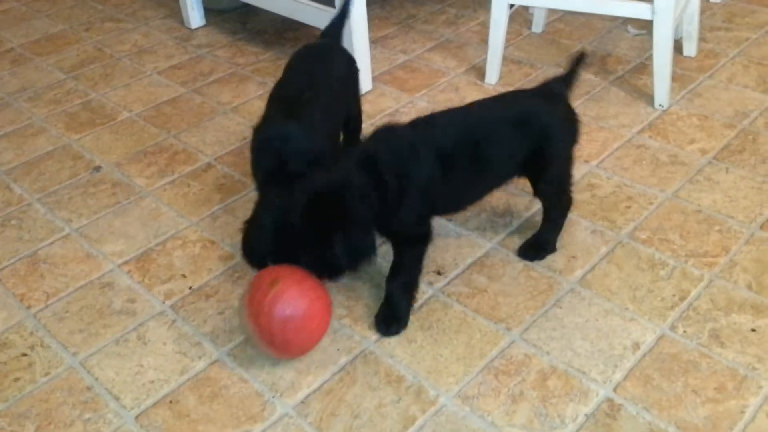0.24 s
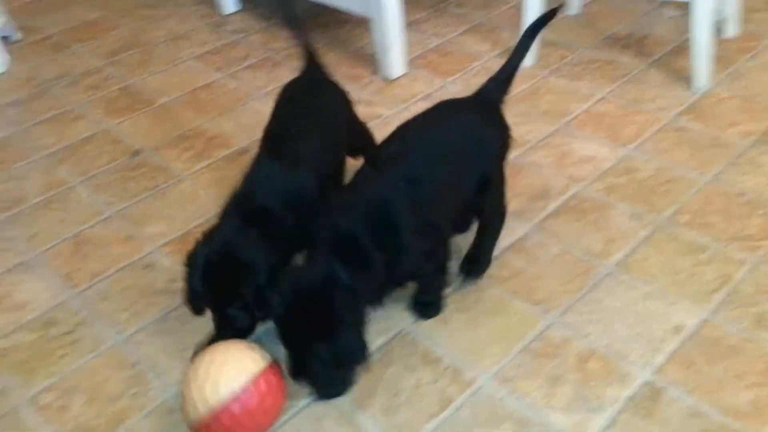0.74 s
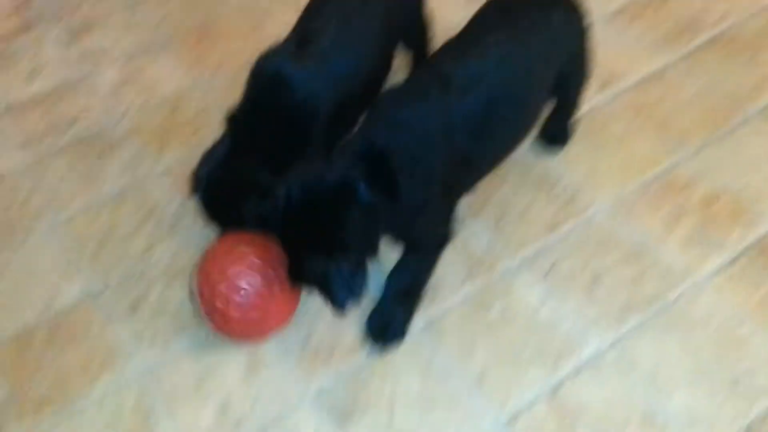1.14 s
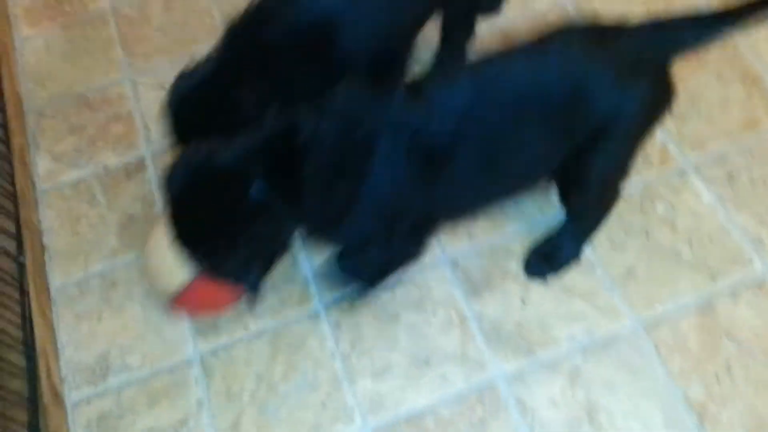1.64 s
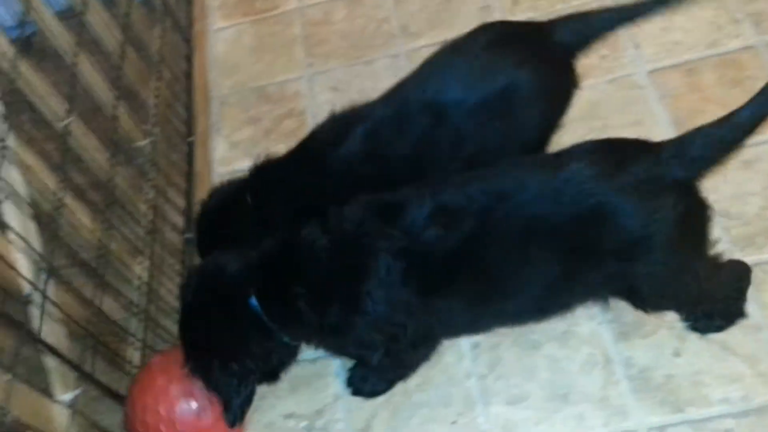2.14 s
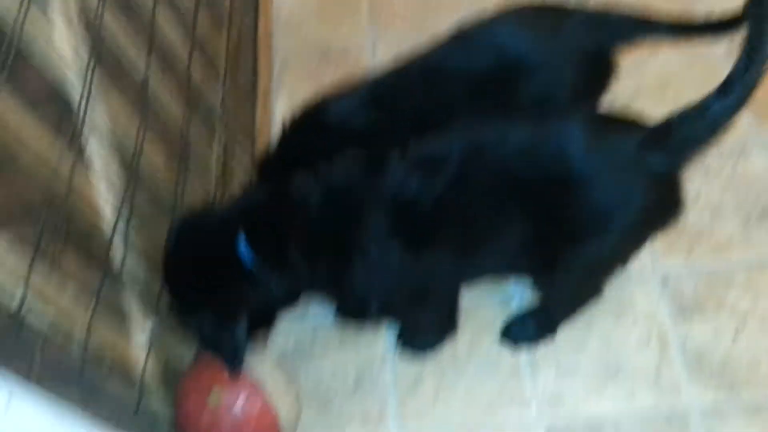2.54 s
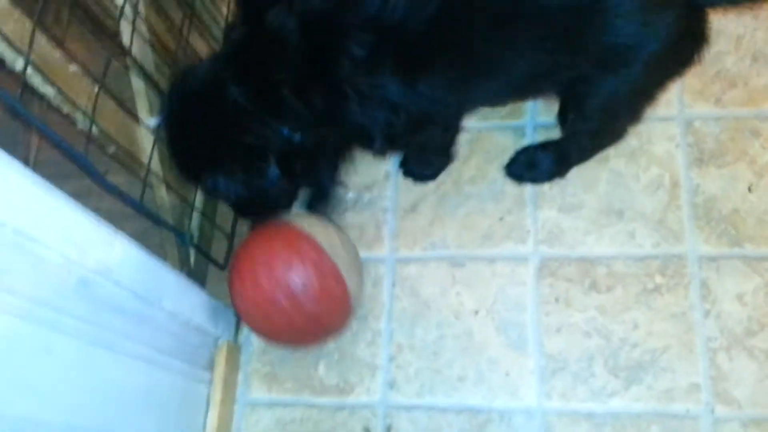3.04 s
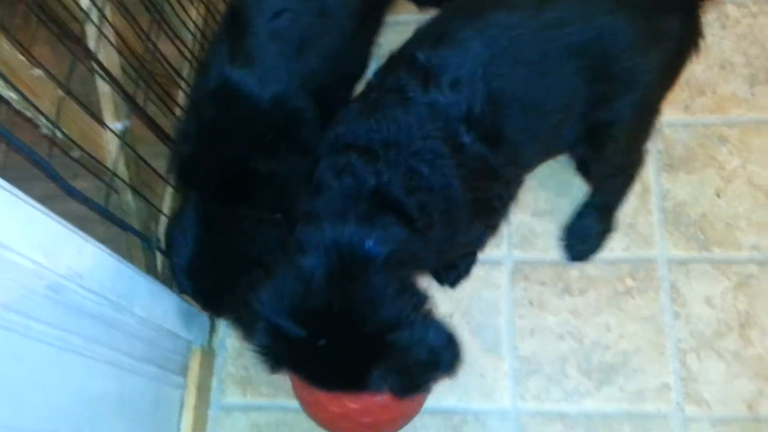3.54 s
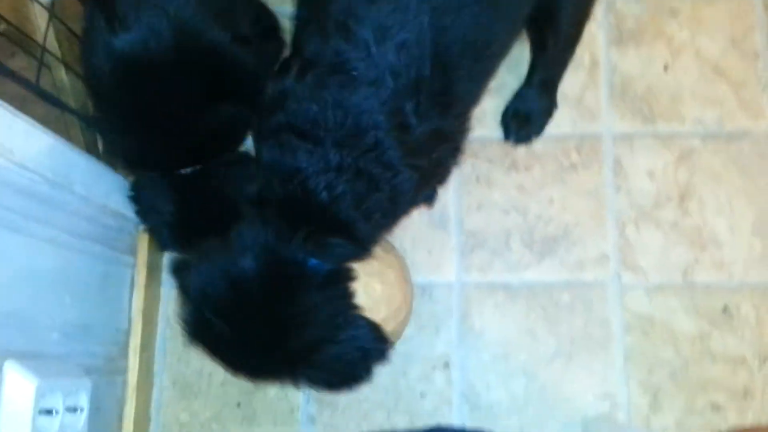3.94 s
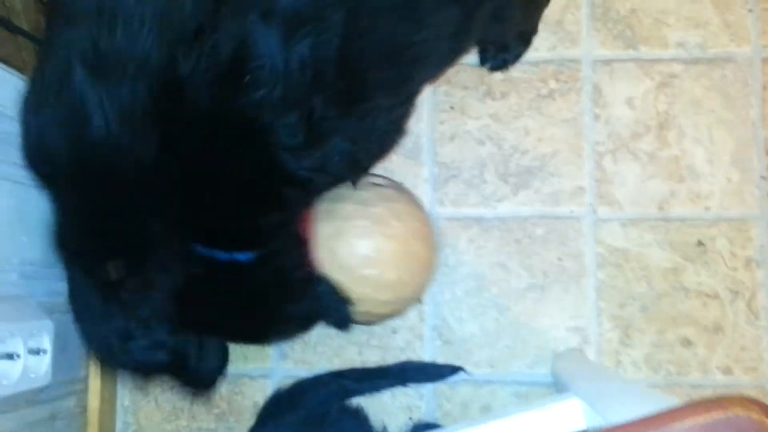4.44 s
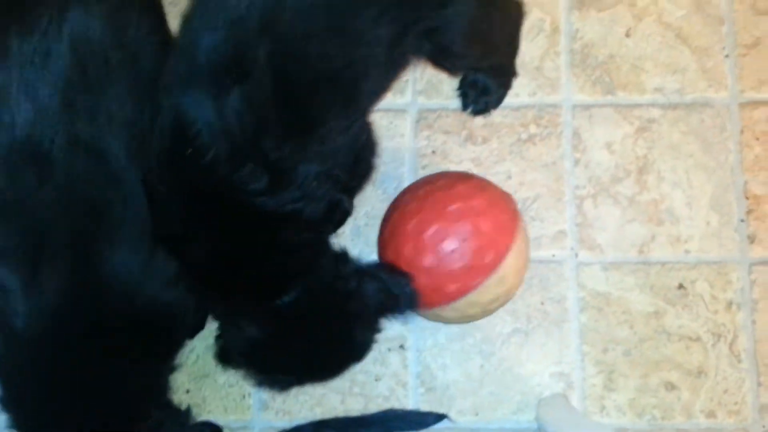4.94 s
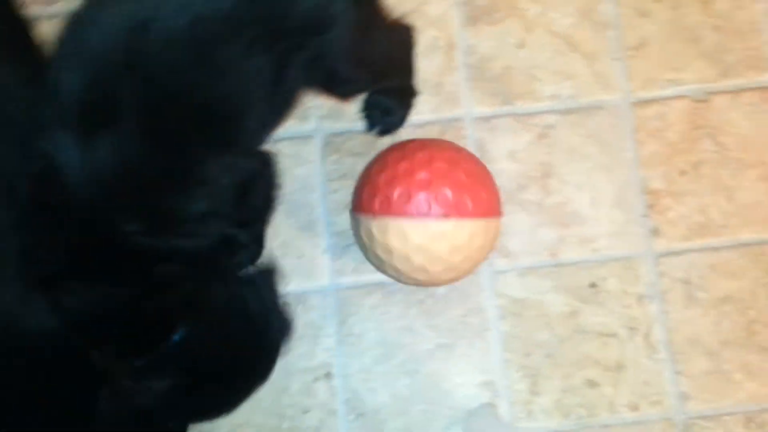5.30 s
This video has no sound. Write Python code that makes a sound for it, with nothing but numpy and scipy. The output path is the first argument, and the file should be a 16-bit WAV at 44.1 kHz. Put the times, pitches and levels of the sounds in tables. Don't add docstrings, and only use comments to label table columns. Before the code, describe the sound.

Puppy paws and claws scuff on tile while a rolling hollow ball clacks faster, crashes against a rattling wire crate, and settles into sparse knocks.

```python
import sys
import numpy as np
from scipy import signal
from scipy.io import wavfile
from scipy.ndimage import uniform_filter1d, minimum_filter1d

SR = 44100
rng = np.random.default_rng(int(sys.argv[2]) if len(sys.argv) > 2 else 0)


def field_ratio(decibels):
    return 10 ** (np.asarray(decibels, dtype=float) / 20)


def inscribe(sig):
    pcm = np.round(np.clip(np.atleast_2d(sig).T, -1, 1) * 32767)
    wavfile.write(sys.argv[1], SR, pcm.astype(np.int16))


N = 245637

# f/Hz, level/dB, time to fade by 60 dB/s
SHELL_MODES = [(1205, 22.5, 0.023), (1472, 11.5, 0.017), (1920, -56, 0.06), (2330, 6, 0.03)]


def rms_one(x):
    return x / np.sqrt(np.mean(x ** 2) + 1e-20)


def in_time(rows):
    s, *columns = np.transpose(rows)
    return [np.interp(np.arange(N) / SR, s, c) for c in columns]


def while_on(rows):
    start, end = rows[0][0], rows[-1][0]
    return np.interp(np.arange(N) / SR, [start - .01, start, end, end + .01], [0, 1, 1, 0])


def at_hz(points, hz):
    f, value = np.transpose(points)
    return np.interp(np.log(hz), np.log(f), value)


def sides(pan_db):
    return field_ratio(np.array([[.5], [-.5]]) * pan_db)


def drift(rate):
    r = np.exp(-80 * np.pi * rate / SR)
    slow = signal.lfilter([1], [1, -2 * r, r * r], rng.standard_normal(N // 40 + 2002))[2000:]
    return np.interp(np.arange(N) / 40, np.arange(len(slow)), rms_one(slow))


def ring(clicks, hz, t60):
    r, w = field_ratio(-60 / (t60 * SR)), 2 * np.pi * hz / SR
    return signal.lfilter([0, np.sin(w)], [1, -2 * r * np.cos(w), r * r], clicks + 1e-18)


def grains(per_s, uneven_db):
    sizes = field_ratio(uneven_db * np.minimum(rng.exponential(1, N), 4)) * rng.choice([-1, 1], N)
    return sizes * (rng.random(N) < per_s / SR)


def add(out, at_s, piece):
    i = round(at_s * SR)
    out[:, i:i + piece.shape[1]] += piece[:, :N - i]


def band(x, low_hz, high_hz):
    return signal.sosfilt(signal.butter(3, [low_hz, high_hz], "band", fs=SR, output="sos"), x)


def dying(events):
    power, t = np.zeros((1, N)), np.arange(SR) / SR
    for s, db, t60 in events:
        add(power, s, field_ratio(2 * db - 120 * t / np.clip(t60, .02, 2))[None])
    return np.sqrt(power[0])


def banded(sources, spectrum, patchy_db):
    # f/Hz, likeness (0 to 1)
    likeness = [(60, 0.55), (180, 0.64), (540, 0.44), (1630, 0.06), (4890, 0.02), (14700, 0.01)]
    # f/Hz, level/dB
    tilt = [(60, -3), (180, 1), (540, -3), (1630, 0.5), (4890, -7), (14700, -2.5)]
    out, edges = 0, 28 * 2 ** np.arange(0, 9.3, .5)
    for k, (low, high) in enumerate(zip(edges, edges[1:])):
        hz = np.sqrt(low * high)
        if at_hz(spectrum, hz) < -45:
            continue
        half_octave = signal.butter(2, [low, high], "band", fs=SR, output="sos")
        mid, side = signal.sosfilt(half_octave, sources[k % 2])
        alike = np.clip(at_hz(likeness, hz), -1, 1)
        gain = field_ratio(at_hz(spectrum, hz) + patchy_db * drift(21.0)) * sides(at_hz(tilt, hz))
        out = out + gain * (np.sqrt(1 + alike) * mid + np.sqrt(1 - alike) * side * [[1], [-1]])
    return rms_one(out)


def bodies():
    # t/s, level/dB
    bustle = [(0.0, -63), (0.31, -62.5), (0.65, -53), (1.16, -51), (1.57, -49.5), (1.92, -50.5),
              (2.03, -39.5), (2.17, -46), (2.44, -54), (3.15, -54), (3.35, -62.5), (3.55, -62),
              (4.15, -58.5), (4.28, -57), (4.42, -52), (4.61, -66.5), (4.84, -64), (5.1, -58), (5.57, -61)]
    # f/Hz, width/Hz, level/dB
    boards = [(132, 82, 11), (212, 21, 2), (242, 22, 0.5), (280, 73, 4.5), (322, 55, -10)]
    # f/Hz, level/dB
    shuffle_colour = [(60, -27), (200, 1.5), (400, -0.5), (700, -5), (1000, 4.5), (2000, -77), (15000, -75)]
    # f/Hz, level/dB
    scuff_colour = [(60, -50), (1000, -71), (2500, -1.5), (4500, 8.5), (7000, 4.5), (10000, -9.5),
                    (15000, -4)]
    # t/s, peak level/dB, time to fade by 60 dB/s
    swipes = [(0.3531, -48, 0.84), (0.6035, -40, 0.06), (0.914, -41.5, 0.48), (1.059, -40, 0.14),
              (1.2744, -42, 0.25), (1.5105, -54, 0.12), (1.6337, -36.5, 0.08), (1.8248, -31, 0.078),
              (1.9215, -39.5, 0.42), (2.7267, -50, 0.29), (2.9144, -55, 0.15), (2.9901, -54, 0.1),
              (3.116, -38, 0.15), (3.2715, -44, 0.14), (3.7494, -44.5, 0.079), (3.9754, -46, 0.88),
              (4.469, -34, 0.24), (4.572, -44, 0.17), (4.7765, -46.5, 0.035), (4.9167, -62, 0.09),
              (5.2394, -47, 0.075)]
    shuffle_db, = in_time(bustle)
    swing_db = shuffle_db + 55
    rumble_db, scuff_db = -59 + 1.67 * swing_db, -58.5 + swing_db

    push = rng.standard_normal((2, N)) * [[1], [.15]] * field_ratio(6.2 * drift(20.0))
    push = np.array([push[0] + push[1], push[0] - push[1]])
    rumble = 0
    for k, (hz, width, db) in enumerate(boards):
        board = ring(ring(push, hz, 1.6 / width), hz, 1.8 / width)
        rumble = rumble + (-1) ** k * field_ratio(db) * rms_one(board)
    rumble = field_ratio(rumble_db - 0.9) * rms_one(band(rumble, 142, 2000)) * sides(-2.5)

    grit = (.5 + np.abs(grains(900, uneven_db=4.5))) * rng.standard_normal((2, 2, N))
    shuffle = field_ratio(shuffle_db + 1.0) * banded(grit, shuffle_colour, patchy_db=2.0)
    swiping = field_ratio(-3.0) * uniform_filter1d(dying(swipes), size=200)
    scuff = np.hypot(field_ratio(scuff_db + 3.0), swiping) * banded(grit[::-1], scuff_colour, patchy_db=1.0)
    return rumble + shuffle + scuff


def chatter():
    # t/s, level/dB
    stages = [
        [(0.0, -77), (0.608, -46.5), (0.914, -52.5), (1.15, -48.5), (1.3, -53.5), (1.44, -50.5), (1.7, -52.5),
         (1.99, -46)],
        [(3.3, -69), (4.36, -56.5), (4.63, -82), (4.97, -76), (5.02, -54.5), (5.2, -59), (5.27, -71),
         (5.38, -60.5)],
    ]
    level = sum(while_on(rows) * field_ratio(in_time(rows)[0]) for rows in stages)
    clicks = grains(410, uneven_db=3.0)
    fade = field_ratio(-60 / (.011 * SR))
    rasps = signal.lfilter([1], [1, -fade], np.abs(clicks)) * rng.standard_normal((2, 2, N))
    dull = sides(-4.0) * rms_one(band(rasps[0], 1320, 2210))
    bright = 0.94 * sides(-2.9) * rms_one(band(rasps[1], 2110, 4280))
    shell = sum(field_ratio(db) * ring(rasps[0], hz, t60) for hz, db, t60 in SHELL_MODES)
    return level * field_ratio(5.0) * rms_one(dull + bright + 0.31 * rms_one(band(shell, 1900, 9800)))


def jangle():
    # t/s, level/dB
    jangling = [
        (1.96, -44),
        (2.144, -38),
        (2.6, -50.5),
        (2.78, -49.5),
        (3.35, -63),
    ]
    # f/Hz, width/Hz, level/dB
    wire_modes = [(2100, 60, 10), (2960, 61, 7), (3540, 73, -26), (4255, 33, 3), (4940, 32, -23),
                  (5430, 24, -29), (5370, 160, -18), (5600, 89, 5), (6900, 310, -28)]
    # f/Hz, level/dB
    wire_colour = [(290, -33), (500, -9.5), (724, 2.5), (922, -42), (1080, 1.5), (1370, 2.5), (4230, 1.5),
                   (13400, -20.5), (14200, -32), (15000, -71)]
    # t/s, wire peak level/dB, time to fade by 60 dB/s, floor pan peak level/dB
    blows = [(0.0034, -39.5, 0.15, -51.5), (1.994, -17, 0.091, -37), (2.006, -7.5, 0.11, -21),
             (2.07, -9.5, 0.27, -21.5), (2.0865, -8.5, 1, -58), (2.133, -9.5, 0.31, -28),
             (2.244, -16.5, 0.61, -60), (2.308, -28, 1, -66), (2.3655, -23.5, 0.6, -55),
             (2.5005, -22, 0.33, -59), (2.657, -29, 0.86, -64), (2.7664, -31, 0.63, -52.5),
             (2.982, -27, 0.066, -40), (3.2753, -36, 0.25, -54), (3.7494, -61, 0.28, -61),
             (4.4687, -34, 0.32, -45), (4.499, -64, 0.27, -61)]
    clashes = grains(3000 * field_ratio(1.5 * drift(60.0)), uneven_db=1.5) * rng.standard_normal((2, 2, N))
    wash = banded(clashes, wire_colour, patchy_db=-1.7)
    rings = 0
    for k, (hz, width, db) in enumerate(wire_modes):
        rings = rings + field_ratio(db) * rms_one(ring(clashes[k % 2], hz, 2.2 / width))
    wires = rms_one(wash + .28 * rms_one(rings) * sides(-4.0))
    wires[0] = signal.sosfilt(signal.butter(1, 3500, fs=SR, output="sos"), wires[0])
    steady = while_on(jangling) * field_ratio(in_time(jangling)[0] + 3.0)
    level = np.hypot(steady, field_ratio(-11.0) * dying([b[:3] for b in blows]))

    pan = rms_one(band(clashes[0] + 2.5 * clashes[1, :1], 173, 846)) * sides(-2.5)
    boom = field_ratio(-2.0) * dying([(s, pan_db, 1.62 * t60) for s, db, t60, pan_db in blows])
    return level * band(wires, 190, 16000) + boom * pan


def thumps():
    # t/s, peak level/dB
    drops = [(0.549, -38), (0.592, -34.5), (0.683, -38), (0.811, -37), (0.913, -30), (0.94, -23),
             (0.987, -31), (1.054, -30.5), (1.126, -20.5), (1.226, -25.5), (1.419, -26.5), (1.5, -20),
             (1.539, -26.5), (1.587, -25.5), (1.659, -25), (1.72, -33), (1.784, -31.5), (1.818, -27.5),
             (1.899, -29), (1.354, -28), (2.83, -39), (2.899, -30.5), (3.279, -35), (3.333, -38)]
    # t/s, peak level/dB, f/Hz
    landings = [(0.004, -34.5, 169), (0.026, -35.5, 216), (0.281, -40.5, 338), (0.44, -40.5, 304),
                (0.571, -32, 320), (0.736, -32, 377), (1.35, -34, 234), (2.01, -9, 228), (2.041, -14, 157),
                (2.075, -12.5, 237), (2.12, -7.5, 248), (2.169, -25, 248), (2.235, -27, 270),
                (2.377, -27.5, 217), (2.646, -43, 214), (2.814, -24, 212), (2.89, -25, 209),
                (2.966, -30, 212), (3.126, -31.5, 280), (3.277, -25.5, 262), (3.332, -34, 252),
                (3.75, -30, 241), (3.754, -38, 560), (4.042, -40, 218), (4.214, -41.5, 167),
                (4.291, -40, 214), (4.473, -29, 162), (4.502, -29.5, 322), (4.779, -35.5, 221),
                (5.202, -39.5, 225), (5.386, -41.5, 185)]
    out, t = np.zeros((2, N)), np.arange(SR // 4) / SR
    weights = [(s, db, 139.3) for s, db in drops] + landings
    weights += [(s, db - 2.5, 230.5) for s, db in drops]
    chance = rng.random((len(weights), 2))
    puffs = band(rng.standard_normal((len(weights), len(t))), 70, 600)
    for (s, db, hz), (turn, step), puff in zip(weights, chance, puffs):
        neighbour_hz = hz * (0.618 + 0.95 * step)
        swing = np.sin(2 * np.pi * hz * t) + 0.48 * np.sin(2 * np.pi * (neighbour_hz * t + turn))
        swing = swing + 0.15 * rms_one(puff)
        swing = swing * field_ratio(-60 * t * hz / 23.5) * (1 - np.exp(-t / 0.0019)) ** 2
        add(out, max(s - .005, 0), field_ratio(db - 9.0) * sides(-2.2) * swing / np.abs(swing).max())
    return band(out, 70, 2300)


def facet_strikes():
    # t/s, peak level/dB
    tips = [(0.193, -36.5), (0.3135, -23), (0.361, -30), (0.414, -34), (0.5414, -26), (0.6514, -36),
            (0.9003, -29), (1.038, -21), (1.074, -17), (1.1713, -27), (1.224, -30), (1.2952, -28.5),
            (1.429, -25.5), (1.561, -18.5), (1.743, -28), (1.7924, -26), (1.907, -25), (2.937, -32),
            (3.327, -39), (3.4543, -37), (3.488, -40), (3.865, -36), (3.603, -39), (3.617, -40),
            (3.885, -34.5), (4.165, -35), (4.149, -36), (4.416, -34.5), (4.63, -43), (0.925, -32),
            (5.189, -31.5), (5.21, -35), (5.275, -47)]
    # t/s, peak level/dB, strongest f/Hz, bareness/dB
    roll_knocks = [(0.2349, -26, 1440, 19.5), (0.2767, -21.5, 1190, 0), (0.4802, -24.5, 2280, 14),
                   (0.4992, -20.5, 1700, 8), (0.5177, -15, 1270, 2), (0.602, -22.5, 1720, 16),
                   (0.6275, -18, 4020, 18), (0.715, -14.5, 1220, -2.5), (0.76, -32, 1260, 14),
                   (0.8027, -17, 2500, 4.5), (0.8197, -31, 1260, 2), (0.8539, -16, 1840, 1.5),
                   (0.8613, -19, 1740, -3), (0.9464, -17.5, 1750, 0), (0.968, -14, 2000, 8),
                   (1.0064, -19, 1870, 4), (1.059, -10, 4200, 4), (1.1242, -11.5, 1240, -0.5),
                   (1.1516, -14.5, 1540, 3.5), (1.4973, -17, 3250, -17), (1.504, -10, 1920, -6),
                   (1.5122, -14, 2900, -11), (1.5748, -17.5, 3430, 13), (1.6745, -18, 1870, -3),
                   (1.691, -11, 3520, -1), (1.7223, -24, 1260, -10), (1.8244, -14, 3260, 3),
                   (1.8289, -11.5, 1230, -5.5), (1.922, -13.5, 2150, 2), (1.9644, -28, 1760, 0),
                   (1.9698, -18, 2100, 0)]
    # t/s, peak level/dB, strongest f/Hz, bareness/dB
    glances = [(0.3353, -30, 4620, 8), (0.353, -24, 4740, 11), (0.4336, -34, 3730, 8),
               (0.5813, -24, 4100, 15), (0.7576, -22.5, 4370, 8), (0.9163, -26, 4510, 8),
               (1.1374, -37, 3980, 8), (1.24, -31, 4180, 8), (1.634, -29, 5720, 8)]
    # t/s, peak level/dB, strongest f/Hz, bareness/dB
    crate_knocks = [(2.0052, -17, 4020, 19), (2.0695, -19, 1220, -11), (2.0863, -7, 4630, 6),
                    (2.1347, -27, 2960, -6), (2.2458, -16, 4250, 3), (2.2578, -10, 2060, -6),
                    (2.272, -28, 4030, 2), (2.3114, -17.5, 1940, -5), (2.504, -29.5, 2820, 13),
                    (2.6584, -30, 2960, -2), (2.727, -29, 2670, -4), (2.7644, -26, 2940, 0),
                    (2.8323, -23.5, 1670, -3), (2.8868, -32.5, 1180, 4), (2.9821, -24, 1500, 8),
                    (2.99, -29, 2270, 7), (3.0163, -35, 2190, 0), (3.044, -34, 1520, 0),
                    (3.072, -34, 1390, 0), (3.0822, -32, 1120, 2), (3.1183, -30, 2090, 1.5),
                    (3.1592, -27.5, 1400, -2), (3.1843, -33, 1490, 0)]
    # t/s, peak level/dB, strongest f/Hz, bareness/dB
    corner_knocks = [(3.531, -27, 1320, -18), (3.5366, -23, 1410, 16), (3.5693, -33.5, 1350, -8),
                     (3.6706, -21, 1430, 13), (3.6835, -30, 1360, -6), (3.7541, -32, 1360, 3),
                     (3.9763, -32.5, 1540, 3), (4.0985, -25.5, 1210, -4), (4.1085, -21.5, 1230, -4),
                     (4.2112, -17, 2100, -10), (4.2594, -24, 1400, -21), (4.3012, -17.5, 1550, 2.5),
                     (4.4729, -27.5, 5670, 33), (4.934, -31, 1420, -10), (4.9734, -26, 1470, -16),
                     (5.001, -27.5, 1480, -10), (5.018, -24.5, 1610, 9), (5.0524, -24.5, 1480, 10),
                     (5.0983, -34, 1470, -8), (5.1256, -20.5, 1630, 3.5), (5.1575, -29, 1670, -10),
                     (5.2225, -30.5, 1760, 17), (5.4655, -36.5, 2100, 5), (5.5362, -21.5, 1460, -3)]
    soft_tips = [(s, db, 1230, 0) for s, db in tips]
    # knocks, brightness at 1500 Hz and -25 dB, grit (dB)
    stages = [(roll_knocks + glances, -20.5, -11.5), (crate_knocks, -10, -3.5),
              (corner_knocks, -20, -24), (soft_tips, -17, -13.5)]
    strikes = []
    for rows, base_db, grit_db in stages:
        for s, db, hz, bare_db in rows:
            bright_db = base_db + bare_db - 0.5 * np.log2(hz / 1500) + 1.34 * (db + 25)
            strikes.append((s, db, hz, bright_db, grit_db))
    return strikes


def knocks():
    out, t = np.zeros((2, N)), np.arange(SR // 15) / SR
    strikes = facet_strikes()
    grit_db = np.array(strikes)[:, 4, None, None, None]
    fade = field_ratio(-60 * t / 0.0055) + field_ratio(grit_db - 60 * t / 0.1)
    cracks = rng.standard_normal((len(strikes), 3, 2, len(t))) * fade
    cracks[..., 0] = 5.0
    cracks = cracks + 0.17 * cracks[:, :, :1]
    dull, bright = band(cracks[:, 0], 1260, 2290), band(cracks[:, 1], 2630, 4780)
    shell = sum(field_ratio(db) * ring(cracks[:, 2], hz, t60) for hz, db, t60 in SHELL_MODES)
    faint = band(shell, 1390, 3800)
    for k, (s, db, pitch_hz, bright_db, _) in enumerate(strikes):
        pitched = band(ring(cracks[k, 2], pitch_hz, 14.0 / pitch_hz), 1000, 6000)
        low = rms_one(dull[k]) + 1.33 * rms_one(pitched) + 0.79 * rms_one(faint[k])
        piece = sides(-3.7) * low + sides(-4.5) * field_ratio(bright_db + 10.0) * rms_one(bright[k])
        add(out, s + .0007, field_ratio(db - 4.5) * piece / np.abs(piece.mean(axis=0)).max())
    return out


def ticks():
    # t/s, peak level/dB
    claw_tips = [
        (0.79, -25),
        (1.1992, -52),
        (2.912, -21),
        (3.8771, -45),
        (3.8946, -18.5),
        (3.927, -17),
        (4.4004, -39),
    ]
    clicks = np.zeros((2, N))
    for s, db in claw_tips:
        add(clicks, s, field_ratio(db + 3.0) * np.array([[1, 0, 0], [0, 0, 1]]))
    return band(clicks, 1200, 12400)


def slide():
    # t/s, level/dB
    dragging = [
        (4.2, -62),
        (4.33, -57.5),
        (4.45, -52),
        (4.53, -54),
        (4.62, -71),
    ]
    rub = rng.standard_normal((2, N)) * field_ratio(2.9 * drift(30.0))
    wash = rms_one(band(rub[:1] + 0.26 * rub, 187, 620))
    return while_on(dragging) * field_ratio(in_time(dragging)[0]) * sides(-3.1) * wash


def kitchen(x):
    t = np.arange(SR // 2) / SR
    fade = field_ratio(-60 * t / .32)
    tail = rng.standard_normal((2, len(t))) * fade * np.clip(t / .006 - 1, 0, 1)
    tail = band(tail, 210, 5000)
    return signal.fftconvolve(x, tail / np.sqrt(np.sum(tail ** 2) / 2), axes=1)[:, :N]


def house_hush():
    # f/Hz, level/dB
    hush_colour = [(15, -30), (25, -10), (35, 1), (54, -28), (172, 0.5), (237, 2.5), (952, -4.5),
                   (1420, 1.5), (2850, -6), (4040, -9.5), (12800, -9), (13800, -21), (15000, -33)]
    return field_ratio(-58.5) * banded(rng.standard_normal((2, 2, N)), hush_colour, patchy_db=2.5)


def scene():
    floor = band(bodies() + jangle() + thumps() + slide(), 100, 16000)
    struck = chatter() + knocks() + ticks()
    return struck + field_ratio(-18) * kitchen(struck) + floor + house_hush()


def tiring_top(x):
    treble = uniform_filter1d(band(x[1], 1500, 9000) ** 2, size=600)
    level = minimum_filter1d(treble, size=1500)
    loud = uniform_filter1d(1. * (level > field_ratio(2 * -38)), size=2500)
    loud = np.roll(loud, round(.055 * SR))
    dull = signal.sosfiltfilt(signal.cheby2(8, 30, 13700, fs=SR, output="sos"), x)
    return x + loud * (dull - x)


def low_pass(x):
    return signal.sosfilt(signal.butter(12, 15310, fs=SR, output="sos"), x)


def record(dry):
    rounded = 0.67 * np.tanh(dry / 0.73)
    thin = signal.sosfilt(signal.cheby2(20, 45, 14850, fs=SR, output="sos"), rounded)
    mix = tiring_top(thin)
    return low_pass(mix)


dry = scene()
out = record(dry)
inscribe(out)
```